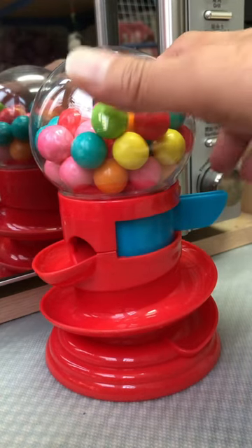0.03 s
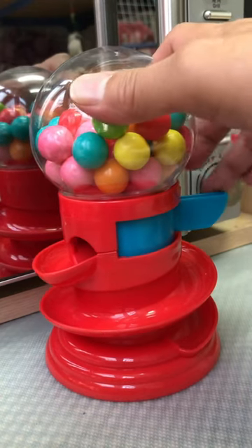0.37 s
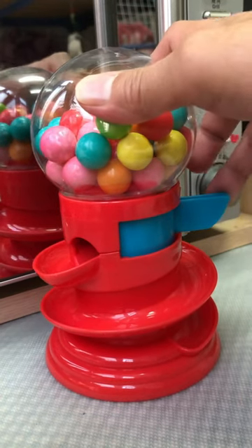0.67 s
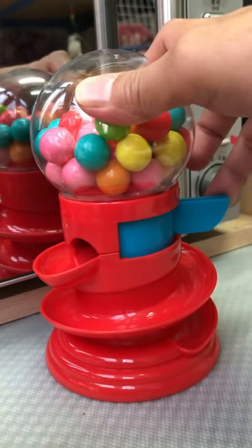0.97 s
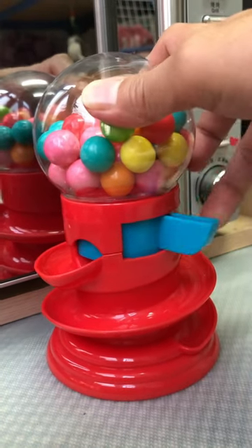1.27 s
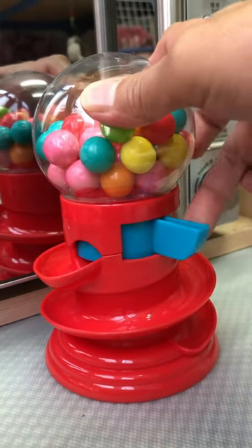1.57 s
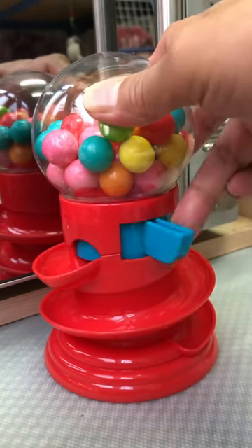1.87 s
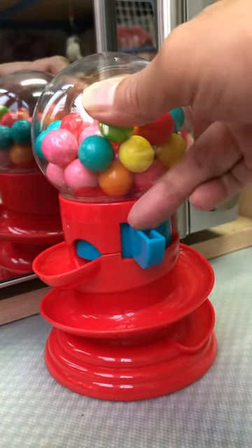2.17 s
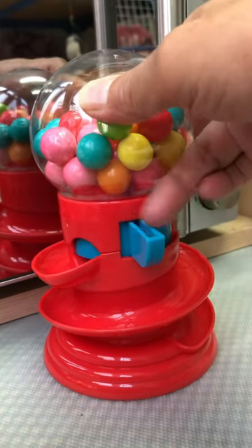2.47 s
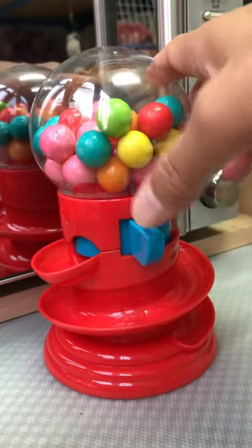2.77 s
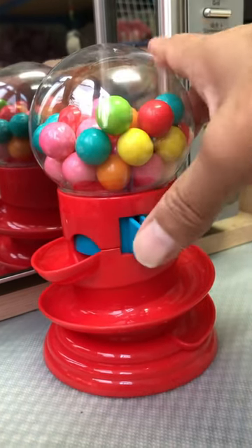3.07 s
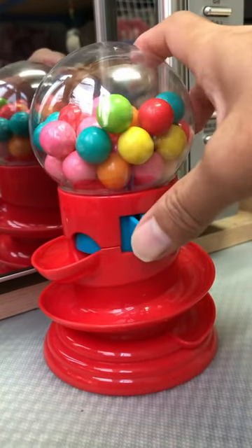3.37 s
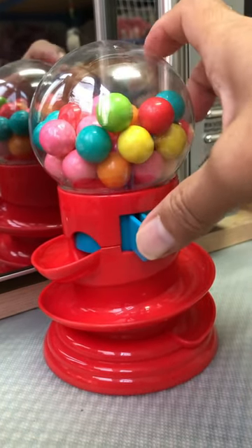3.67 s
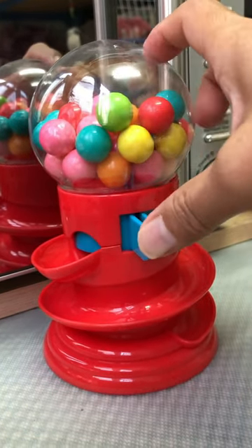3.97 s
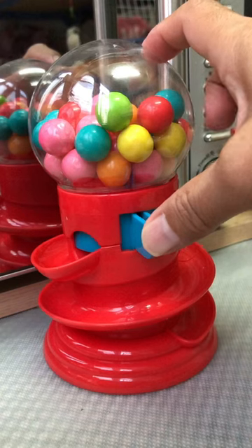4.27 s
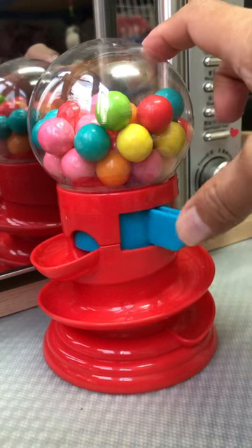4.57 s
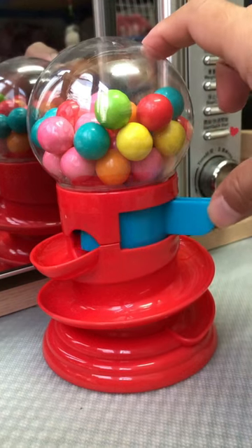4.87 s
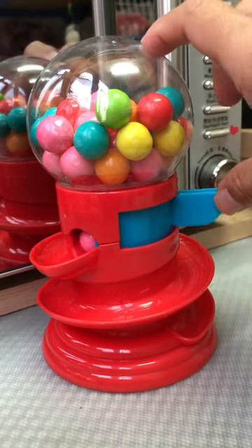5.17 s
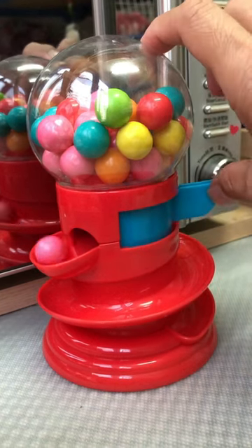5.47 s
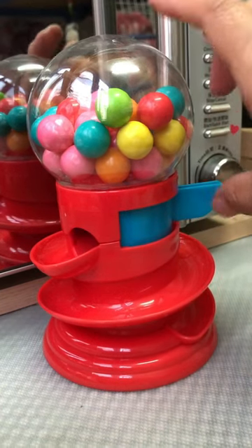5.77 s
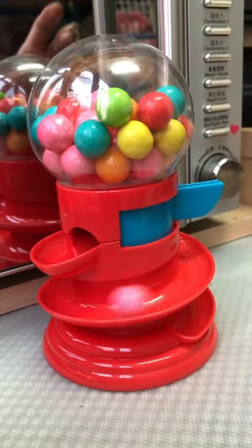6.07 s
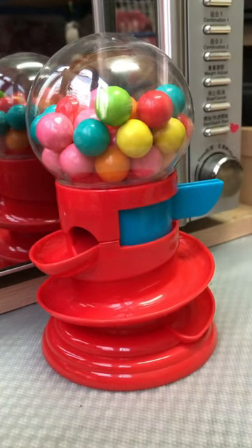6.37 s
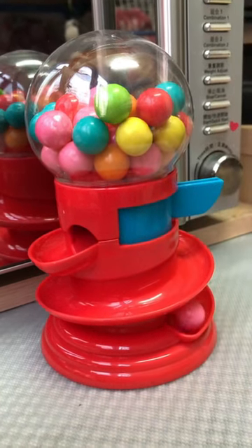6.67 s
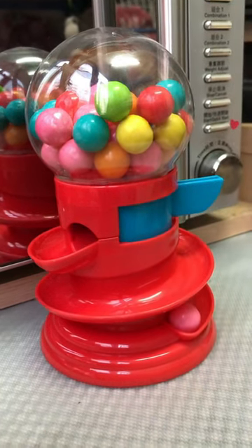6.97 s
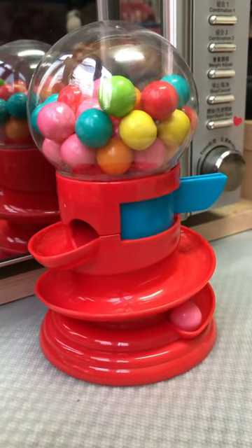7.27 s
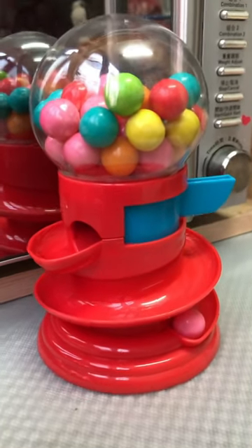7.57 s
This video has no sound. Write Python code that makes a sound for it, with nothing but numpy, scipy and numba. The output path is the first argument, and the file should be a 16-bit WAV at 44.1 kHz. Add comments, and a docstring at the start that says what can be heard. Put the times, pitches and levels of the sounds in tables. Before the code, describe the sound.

Sharp plastic lever clacks and tumbling gumballs, close up, followed by one ball rolling down a toy's chute and bouncing to rest.

```python
"""Toy gumball machine, close up

On a kitchen counter, microphone hand-held and close. The plastic lever clacks round, a small spring
rings, gumballs tumble into the pocket and a thumb pushes the lever back to its stop. One ball rolls
and hops down the spiral chute and settles in the cup; each knock is a bending wave in a plastic shell.
Quiet room tone and a low hum lie behind, with a little handling rumble at the end."""
import sys
import numpy as np
from scipy import signal
from scipy.fft import rfft, irfft
from scipy.io import wavfile
from scipy.ndimage import uniform_filter1d
from numba import njit

SR = 44100
rng = np.random.default_rng(int(sys.argv[2]) if len(sys.argv) > 2 else 0)


def store_pcm(level_fs):
    """Save levels as 16-bit WAV."""
    pcm = np.round(np.clip(level_fs, -1, 1) * 32767).astype(np.int16)
    wavfile.write(sys.argv[1], SR, np.atleast_2d(pcm).T)


N = 336042
TIME = np.arange(N) / SR
SIZE = 4096  # samples in one knock

# Kicks the ball takes on the chute and in the cup; hardness is the tilt of the treble:
# (time [s], level [dB], hardness [dB/octave], struck spot [Hz], flight [s], loss per bounce [dB])
CHUTE_KICKS = [(5.3488, -28, 1.5, 1880, 0.015, 2.5), (5.4006, -38, -4, 3550, 0.0074, -1.5),
               (5.4493, -31, -0.5, 1800, .031, 7), (5.625, -33.5, 5, 2050, 0.0042, 2.5),
               (5.7051, -28, 3, 1780, 0.0093, 3.5), (5.8509, -32.5, 8.5, 3520, .013, 9),
               (5.8916, -21.5, 7, 5100, 0.018, 4.5), (5.926, -25, 2, 1690, 0.0062, 14),
               (5.945, -28.5, 5, 3800, .011, 27), (5.9738, -26.5, 3, 1970, .0098, 5.5),
               (6.0388, -31, 2, 3940, .013, 1.5), (6.0895, -29.5, 15, 1730, 0.021, 20),
               (6.1026, -26.5, 4.5, 1801, .0097, 2.5), (6.1656, -31.5, 2.5, 4300, 0.023, 4),
               (6.2031, -31, 3, 4240, 0.0088, 18), (6.2449, -27.5, -3, 1540, 0.032, 4.5),
               (6.2582, -25, 9, 3260, 0.033, 6), (6.3447, -35.5, -2, 3570, 0.013, 2.5),
               (6.3924, -30, 0.5, 4200, .017, 1), (6.4123, -25, 3.5, 1920, 0.011, 12)]
CUP_KICKS = [(6.4627, -28, 4, 2700, 0.0042, 6), (6.4945, -34, 10, 6780, 0.011, 23),
             (6.5106, -25.5, 2.5, 2420, 0.013, 4), (6.564, -12.5, 2.5, 2100, 0.004, 23),
             (6.602, -25.5, -4, 2300, 0.0068, 5), (6.615, -25, 6.5, 2350, 0.011, 15),
             (6.6632, -32.5, 1.5, 2370, 0.038, 7), (6.7302, -26.5, -1.5, 2290, 0.0058, 6),
             (6.7678, -35.5, -2.5, 1800, .0215, 8.5)]
# The track under the rolling ball: (time [s], rumble [dB], lower resonance [Hz], upper resonance [Hz])
ROLL_PATH = [(5.35, -50, 520, 1830), (5.608, -46, 510, 1930), (5.629, -48.5, 1400, 1926),
             (5.79, -45.5, 1030, 1723), (5.85, -43, 716, 1100), (5.97, -46.5, 710, 1050),
             (6.04, -46.5, 650, 1610), (6.12, -44, 550, 1764), (6.21, -46.5, 574, 1580),
             (6.35, -49.5, 677, 1490), (6.79, -49.5, 700, 1641)]
# Broad colour of the plastic parts: (frequency [Hz], level [dB])
LEVER_COLOUR = [(260, -6.5), (490, -4.5), (860, -7.5), (1470, -5.5), (2120, -5.5), (2830, -11),
                (3840, -2.5), (5750, -7), (8690, -13.5), (12760, -20)]
CHUTE_COLOUR = [(260, -11.5), (490, -4), (860, -6.5), (1470, -2), (2120, 2.5), (2830, -2.5), (3840, -3),
                (5750, -11.5), (8690, -16.5), (12760, -27)]
# Resonances standing out of that colour: (frequency [Hz], width [Hz], lift [dB])
HOUSING_MODES = [(250, 39, 8), (484, 65, 8.5), (950, 70, 0), (2060, 160, 1), (3400, 420, 4.5),
                 (4200, 260, 0.5), (4635, 130, 4.5), (6180, 260, 6), (6620, 150, 7), (8540, 400, 4)]
CHUTE_MODES = [(770, 61, 4.8), (1190, 76, 4.5), (1732, 96, 5.6), (3810, 470, 0.74), (4760, 580, 2.6),
               (6270, 150, 4), (9200, 320, 2)]


def lever(play_s=.0026, play_loss_db=7.5):
    """The lever has play, so each catch lands again, weaker; the hard stops leave it chattering."""
    # Catches, stops and fingers on the toy:
    # (time [s], level [dB], hardness [dB/octave], struck spot [Hz], housing thump [dB])
    catches = [(0.4757, -25.5, 0.5, 3680, 4.5), (0.9395, -40.5, -3, 1400, 11),
               (1.1342, -11.5, -0.5, 3550, -9.5), (1.1431, -5.5, 5, 3950, 0), (1.163, -17, 0, 4650, 3),
               (1.1758, -17, 0.5, 2140, -1), (1.2291, -40, -4, 1950, 4), (1.2633, -45, -1, 1400, -3),
               (1.2856, -37, -7.5, 4340, -19), (1.3901, -31, -2.5, 3680, -25), (1.3963, -38, -1, 3510, 2),
               (1.4181, -42, -5, 3900, -9), (1.9415, -28.5, -0.5, 3900, -5.5),
               (1.9823, -12.5, 3, 3360, -2.5), (2.0324, -18, 0, 3380, -4), (2.058, -13, 6.5, 1730, 2),
               (2.4664, -41, 3, 4000, -1), (2.571, -38, 10.5, 6950, 23), (4.8543, -38.5, -5, 3830, 5),
               (4.8742, -44.5, -1.5, 3950, -7), (4.9204, -43, -9.5, 3700, -12), (4.9825, -29, 0, 4140, -5),
               (5.0049, -7.5, 5, 4660, 4), (5.0516, -21.5, 0.5, 3370, -2), (5.0898, -37, 0, 4840, 6)]
    # Chatter: (time [s], level [dB], loss per contact [dB], first gap [s], struck spot [Hz], thump [dB])
    stops = [(1.151, -23, 2.5, .006, 247.6, 3.5), (5.0099, -19, 2.15, .003, 407, -1)]
    again = [(s + play_s, db - play_loss_db, hardness + .5, hz, thump)
             for s, db, hardness, hz, thump in catches]
    chatter = [(*contact, hz, thump) for s, db, loss_db, gap_s, hz, thump in stops
               for contact in rattle(s, db, loss_db, gap_s, hardness=-2, count=11)]
    return from_db(-1) * knocks(list(catches) + again + chatter, LEVER_COLOUR, HOUSING_MODES,
                                ring_s=.019, ring_db=9, spread_s=.0008, rock_db=5.5, spot_db=9)


def pocket(spot_hz=1980, thump_db=.2):
    """A few gumballs drop hard into the pocket while the rest jostle and settle."""
    # Gumballs landing: (time [s], level [dB], hardness [dB/octave])
    drops = [(2.0615, -12.5, -1.5), (2.073, -12.5, -4.5), (2.0898, -15.5, -0.5), (2.1182, -13, 4.5),
             (2.1225, -24, 3), (2.1463, -18, 6), (2.1825, -18.5, -0.5), (2.2171, -23, -1.5)]
    # Colour of the pocket: (frequency [Hz], level [dB])
    colour = [(260, -14), (490, -7.5), (860, 5), (1470, -3), (2120, 2), (2830, -4), (3840, -4.5),
              (5750, -8.5), (8690, -18.5), (12760, -18.5)]
    settling = rattle(start_s=2.0973, db=-19, loss_db=2, gap_s=.0092, hardness=-5, count=9)
    contacts = [(*contact, spot_hz, thump_db) for contact in list(drops) + settling]
    return from_db(-2.2) * knocks(contacts, colour, HOUSING_MODES,
                                  ring_s=.025, ring_db=-.5, spread_s=.0018, rock_db=-2, spot_db=5)


def chute(hops=44, leaves_spout_s=5.6, floor_hz=1830, wall_hz=3700):
    """The ball bounces down the spiral, with small uneven hops that are stronger where it rolls harder."""
    descent_s = CUP_KICKS[0][0] - leaves_spout_s
    s = leaves_spout_s + descent_s * (np.arange(hops) + rng.random(hops)) / hops
    db = roll_db(s) + rng.normal(8, 2, hops)
    hardness = rng.normal(-.5, 6, hops)
    spot_hz = rng.choice([floor_hz, wall_hz], hops)
    contacts = bounces(CHUTE_KICKS) + list(zip(s, db, hardness, spot_hz))
    return from_db(-1.35) * knocks(contacts, CHUTE_COLOUR, CHUTE_MODES,
                                   ring_s=.012, ring_db=-1.5, spread_s=.001278, rock_db=2.5, spot_db=8)


def cup():
    """The ball hits the sides of the cup and bounces to rest."""
    # Colour of the cup: (frequency [Hz], level [dB])
    colour = [(260, -15), (490, -9.5), (860, -7), (1470, -7), (2120, 1.5), (2830, -5), (3840, -17.5),
              (5750, -15.5), (8690, -20.5), (12760, -30.5)]
    # Its resonances: (frequency [Hz], width [Hz], lift [dB])
    modes = [(370, 47, 3.7), (1600, 70, 12.7), (2170, 990, 5.8), (3520, 180, 15), (4080, 360, 13.8),
             (6240, 500, 4.6)]
    return from_db(.4) * knocks(bounces(CUP_KICKS), colour, modes,
                                ring_s=.015, ring_db=-2, spread_s=.000567, rock_db=-1.5, spot_db=4)


def rattle(start_s, db, loss_db, gap_s, hardness, count, widening=1.25):
    """Loose parts knock ever more rarely and weakly: (time [s], level [dB], hardness [dB/octave])."""
    k = np.arange(count)
    gap_jitter, db_jitter = rng.standard_normal((count, 2)).T
    gaps = gap_s * widening ** k * np.exp(.092 * gap_jitter)
    times = start_s + np.cumsum(gaps) - gaps
    return list(zip(times, db - loss_db * k + db_jitter, hardness + .17 * k))


def bounces(kicks, dulling=1.5):
    """After each kick the ball lands twice more, evenly spaced and duller each time."""
    return [(s + flight_s * k, db - loss_db * k, hardness - dulling * k, hz)
            for s, db, hardness, hz, flight_s, loss_db in kicks for k in range(3)]


def knocks(contacts, colour, modes, ring_s, ring_db, spread_s, rock_db, spot_db, spot_q=5, rock_s=.05):
    """Each contact sends a bending wave through the shell; reflections die fast, the bass rocks on."""
    out, hz, t = np.zeros(N + SIZE), bins(SIZE), TIME[:SIZE]
    shell = shell_db(colour, modes, hz)
    treble_octaves = np.log2(np.maximum(hz / 1500, 1))
    bass = 1 / (1 + (hz / 900) ** 4)
    bending = np.exp(-4j * np.pi * spread_s * np.sqrt(1000 * hz))  # treble first, 1 kHz after spread_s
    fades = from_db(-60 * t / ring_s), from_db(-60 * t / rock_s)
    for s, db, hardness, spot_hz, *thump in contacts:
        reflections, rocking = (rfft(rms_one(rng.standard_normal(SIZE) * fade)) / np.sqrt(SIZE)
                                for fade in fades)
        motion = 1 + from_db(ring_db) * reflections + from_db(rock_db) * bass * rocking
        spot = spot_db / (1 + (2 * spot_q * (hz / spot_hz - 1)) ** 2)  # the struck spot's own pitch
        response = causal(shell + spot + hardness * treble_octaves + sum(thump) * bass)
        wave = rms_one(irfft(motion * bending * response))
        start = round(s * SR)
        out[start:start + SIZE] += from_db(db) * wave * np.sqrt(.005 * SR / SIZE)  # level over 5 ms
    return out[:N]


def rolling(low_width_hz=90, high_width_hz=220):
    """The ball's rough skin drums on the track, whose resonances shift as it circles; it rubs the wall."""
    # Colours of the drumming and of the rubbing: (frequency [Hz], level [dB])
    drum_colour = [(300, -4), (600, 6.5), (1800, 2.5), (2700, -0.5), (3800, -5), (6000, -13.5),
                   (15000, -26.5)]
    rub_colour = [(800, -13), (2000, -2), (2800, 2), (3800, -2), (6500, -9), (14000, -25)]
    s, _, low_hz, high_hz = np.transpose(ROLL_PATH)
    drum = drive_shell(grains(per_s=1500, spread_db=3.5), drum_colour, CHUTE_MODES)
    track = from_db(-10) * drum
    for hz, width_hz in (low_hz, low_width_hz), (high_hz, high_width_hz):
        radians = 2 * np.pi * np.interp(TIME, s, hz) / SR
        track += from_db(-4) * rms_one(gliding_mode(drum, radians, np.exp(-np.pi * width_hz / SR)))
    jolts = np.diff(grains(per_s=150, spread_db=2), prepend=0)
    ticks = drive_shell(jolts, CHUTE_COLOUR, CHUTE_MODES)
    rub = drive_shell(grains(per_s=590, spread_db=7), rub_colour, CHUTE_MODES)
    wall = from_db(-9.5) * rub + from_db(-12) * ticks
    on_chute = (TIME > CHUTE_KICKS[0][0]) & (TIME < CUP_KICKS[0][0])
    return from_db(np.maximum(roll_db(TIME), -120)) * (track + wall * on_chute)


def roll_db(t, rise_db_per_s=199, fall_db_per_s=422):
    """The ball's rumble picks up in the spout, follows the track and stops in the cup."""
    s, db = np.transpose(ROLL_PATH)[:2]
    before_s, after_s = np.maximum(s[0] - t, 0), np.maximum(t - s[-1], 0)
    return np.interp(t, s, db) - rise_db_per_s * before_s - fall_db_per_s * after_s


def scuffs(rasp_hz=3950, rasp_width_hz=900, rasp_db=3):
    """Sliding surfaces catch many times a second and make the lever and housing rasp."""
    # Plastic sliding on plastic or under a fingertip: (middle [s], half length [s], level [dB])
    slides = [(0.472, 0.0018, -33), (1.165, .022, -20), (1.948, 0.023, -30), (2.126, 0.063, -34),
              (2.385, 0.0072, -42), (2.453, 0.016, -46), (3.026, 0.015, -55), (3.065, 0.0082, -55),
              (3.518, .018, -58), (4.574, .1, -60.5), (4.79, .11, -58), (5.029, 0.027, -29),
              (7.554, 0.11, -64)]
    pressure = sum(from_db(db) * np.exp(-((TIME - s) / half) ** 2) for s, half, db in slides)
    modes = list(HOUSING_MODES) + [(rasp_hz, rasp_width_hz, rasp_db)]
    return pressure * drive_shell(grains(per_s=3700, spread_db=4), LEVER_COLOUR, modes)


def spring(swell_s=.0024, flutter=.5):
    """Thin, very high tones build up along a small steel coil and die away, fluttering as it shakes."""
    # The spring ringing: (time [s], frequency [Hz], level [dB], t60 [s])
    rings = [(.4765, 12080, -36, .04), (1.146, 12020, -31, .14), (2.067, 15423, -12, .17),
             (2.064, 15019, -28, .22), (2.117, 11725, -33, .2), (2.117, 15600, -29, .15)]
    out, t = np.zeros(N), TIME[:SR // 2]
    for s, hz, db, t60 in rings:
        shake = 1 + flutter * rms_one(uniform_filter1d(rng.standard_normal(len(t)), size=400))
        envelope = from_db(db - 60 * t / t60) * (1 - np.exp(-t / swell_s))
        start = round(s * SR)
        out[start:start + len(t)] += envelope * shake * np.sin(2 * np.pi * hz * t)
    return out


def kitchen(toy, near_db=-22.5, near_s=.16, tail_db=-26.5, gap_s=.005):
    """Counter and oven door reflect into the microphone; a faint tail follows, shortest in the treble."""
    # Reverberation of the kitchen: (frequency [Hz], t60 [s])
    decay = [(200, .35), (1500, 0.57), (5000, 0.26), (14000, 0.24)]
    t = TIME[:SR // 2]
    arrival = np.clip(t / gap_s - .5, 0, 1)
    edges = np.geomspace(120, 16000, 8)
    tail = sum(noise_band(low, high, len(t)) * from_db(-60 * t / at_hz(decay, np.sqrt(low * high)))
               for low, high in zip(edges, edges[1:]))
    near = signal.lfilter([1], [1, -.4], rng.standard_normal(len(t))) * from_db(-60 * t / near_s)
    echo = from_db(near_db) * rms_one(near * arrival) + from_db(tail_db) * rms_one(tail * arrival)
    return signal.fftconvolve(toy, echo / np.sqrt(len(t)))[:N]


def handling():
    """The hand holding the microphone shifts and makes it rumble."""
    # Handling noise: (time [s], level [dB])
    grip = [(7.05, -69.5), (7.35, -57.5), (7.46, -42.5), (7.53, -50), (7.61, -44.5)]
    s, db = np.transpose(grip)
    return from_db(np.interp(TIME, s, db, left=-120)) * rms_one(noise_band(60, 220, N))


def room_tone(air_db=-47.5, waver_hz=3.9):
    """Steady kitchen noise with a low hum wandering in it."""
    # Colour of the room noise: (frequency [Hz], level [dB])
    air_colour = [(20, -44.5), (40, -15.5), (54, 0), (114, -5), (165, -6.5), (320, -8.5), (480, -14.5),
                  (700, -20), (1000, -19), (1350, -16), (2160, -28.5), (2910, -24.5), (3720, -33),
                  (6500, -39), (9000, -47), (16000, -53.5)]
    # Course of the hum: (time [s], frequency [Hz], relative level [dB])
    hum_path = [(0, 78, -63), (0.702, 80, -44.5), (1.1, 93, -52.5), (1.4, 102, -50.5), (1.85, 80, -47.5),
                (2.5, 83, -51.5), (3.0, 100, -50), (3.7, 112, -48), (4.4, 112, -62.5), (7.6, 105, -56.5)]
    air = rms_one(irfft(rfft(rng.standard_normal(N)) * from_db(at_hz(air_colour, bins(N))), N))
    s, hz, db = np.transpose(hum_path)
    waver = waver_hz * rms_one(uniform_filter1d(rng.standard_normal(N), size=2000))
    hum = np.sqrt(2) * np.sin(2 * np.pi * np.cumsum(np.interp(TIME, s, hz) + waver) / SR)
    return from_db(air_db) * air + from_db(np.interp(TIME, s, db) - 2) * hum


def shell_db(colour, modes, hz, lowest_hz=200):
    """A plastic shell's response: broad colour, resonances and no deep bass from so small a thing."""
    lift = sum((from_db(db) ** 2 - 1) / (1 + (2 * (hz - f) / width) ** 2) for f, width, db in modes)
    bass_cut = (hz + 10) ** 4 / ((hz + 10) ** 4 + lowest_hz ** 4)
    return at_hz(colour, hz) + 10 * np.log10(np.maximum(1 + lift, .01) * bass_cut)


def drive_shell(force, colour, modes):
    """The sound of a shell driven by a force, at unit power."""
    impulse = irfft(causal(shell_db(colour, modes, bins(SIZE))))
    return rms_one(signal.fftconvolve(force, impulse)[:N])


def grains(per_s, spread_db):
    """Tiny random contacts of uneven size."""
    sizes = from_db(spread_db * np.minimum(rng.exponential(1, N), 4)) * rng.choice([-1, 1], N)
    return sizes * (rng.random(N) < per_s / SR)


@njit
def gliding_mode(force, radians, keep):
    """A resonance whose pitch moves from sample to sample."""
    out, state = np.zeros(len(force)), 0j
    for i in range(len(force)):
        state = state * keep * np.exp(1j * radians[i]) + force[i]
        out[i] = state.real
    return out


def causal(gain_db):
    """Minimum-phase response with this gain: nothing sounds before its cause."""
    cepstrum = irfft(gain_db * np.log(10) / 20)
    half = len(cepstrum) // 2
    cepstrum[1:half] *= 2
    cepstrum[half + 1:] = 0
    return np.exp(rfft(cepstrum))


def noise_band(low_hz, high_hz, size):
    """Band-passed white noise."""
    band = signal.butter(2, [low_hz, high_hz], "band", fs=SR, output="sos")
    return signal.sosfilt(band, rng.standard_normal(size))


def at_hz(points, hz):
    """Read a table on a log-frequency axis."""
    f, value = np.transpose(points)
    return np.interp(np.log(np.maximum(hz, 1)), np.log(f), value)


def bins(size):
    """Frequencies of a spectrum."""
    return np.arange(size // 2 + 1) * SR / size


def from_db(db):
    """Decibels to gain."""
    return 10 ** (np.asarray(db) / 20)


def rms_one(x):
    """Scale to unit power."""
    return x / np.sqrt(np.mean(x ** 2) + 1e-20)


def scene():
    """One microphone close to the toy, with the kitchen faint around it."""
    toy = lever() + pocket() + chute() + cup() + scuffs() + rolling() + spring()
    return (toy + kitchen(toy) + room_tone() + handling())[None]


def record(dry, ceiling=1.1, cutoff_hz=15900):
    """The sharpest peaks are rounded and the highest treble is cut."""
    lowpass = signal.ellip(10, .1, 80, cutoff_hz, fs=SR, output="sos")
    return signal.sosfilt(lowpass, ceiling * np.tanh(dry / ceiling))


dry = scene()
out = record(dry)
store_pcm(out)
```